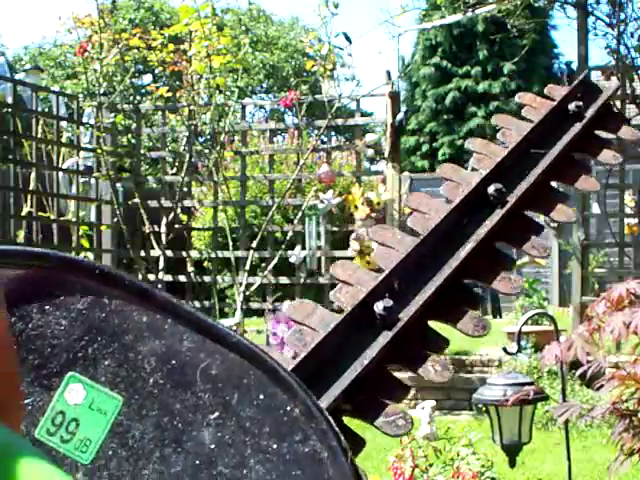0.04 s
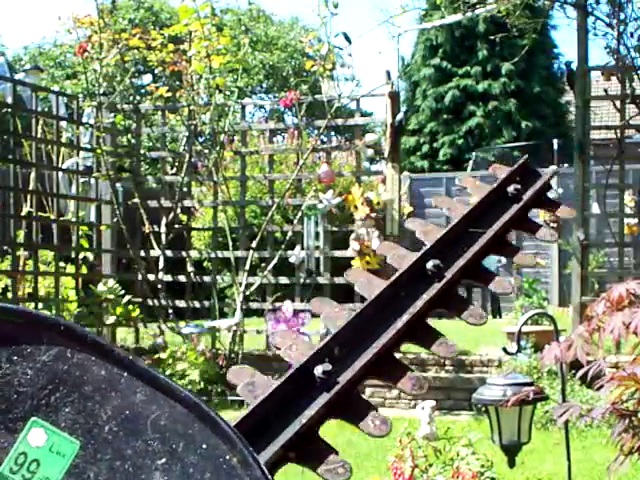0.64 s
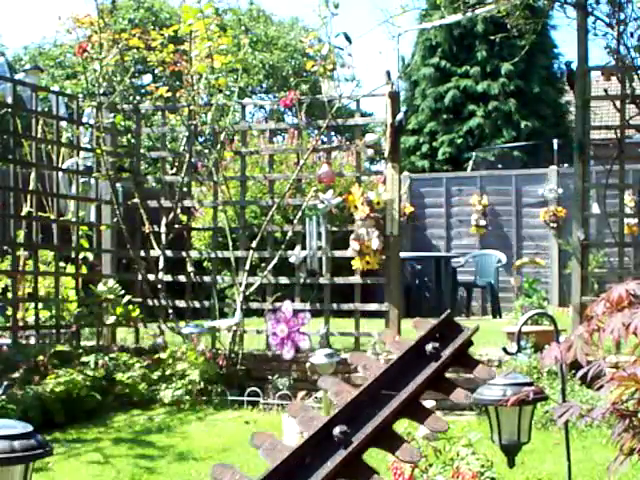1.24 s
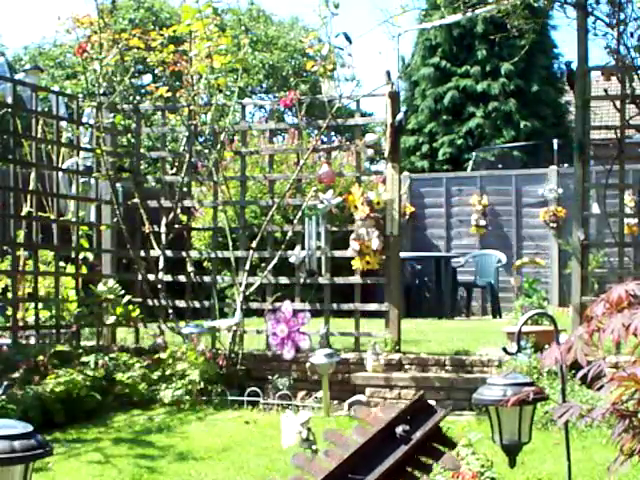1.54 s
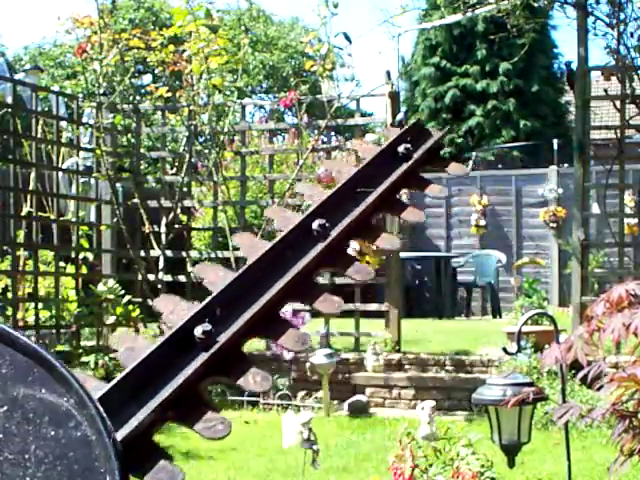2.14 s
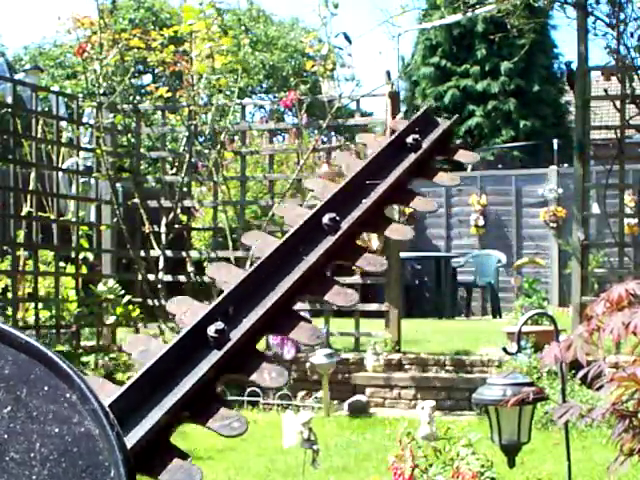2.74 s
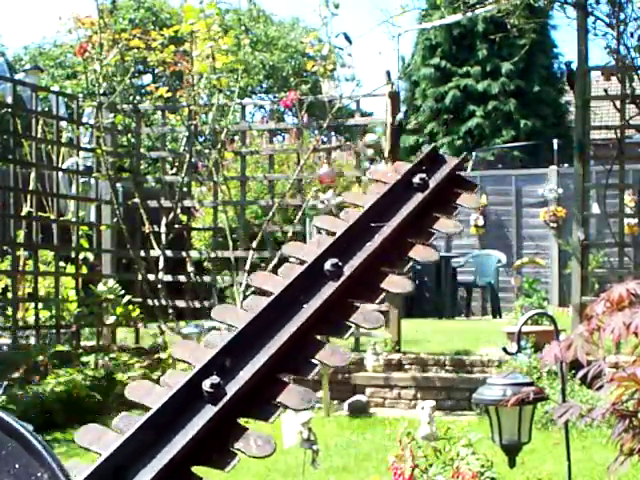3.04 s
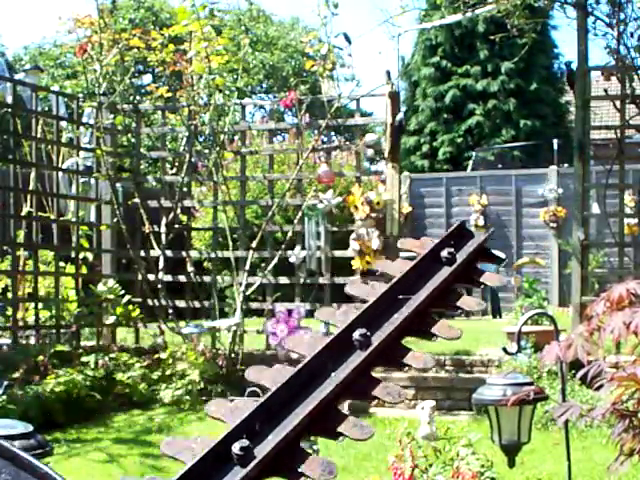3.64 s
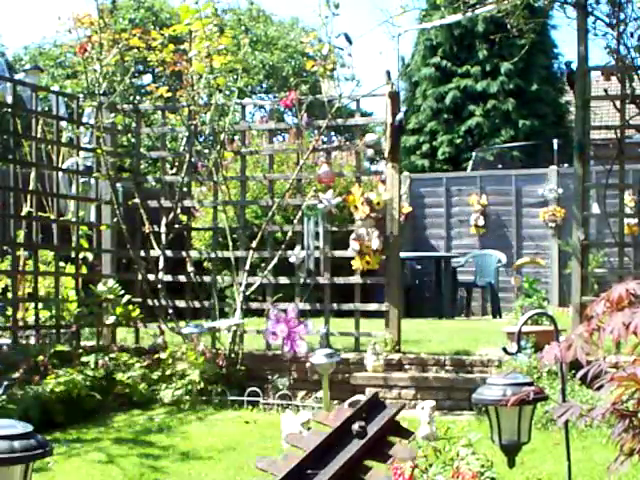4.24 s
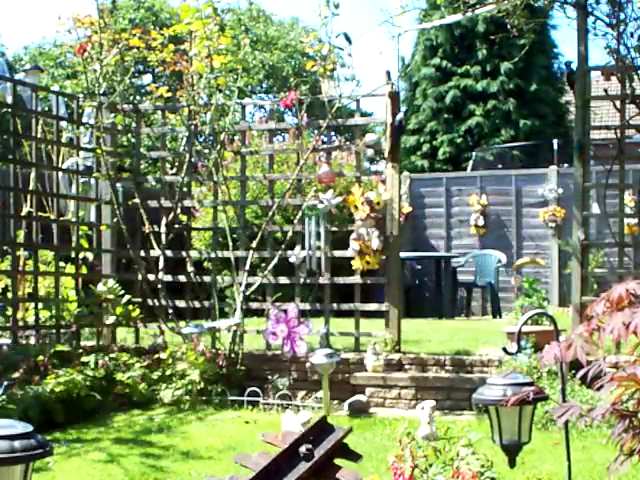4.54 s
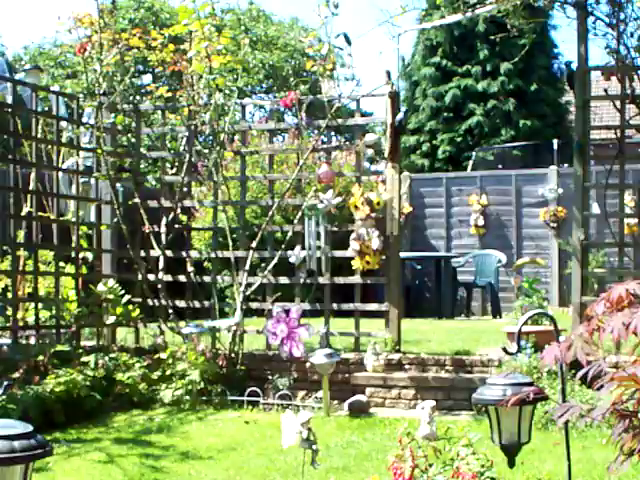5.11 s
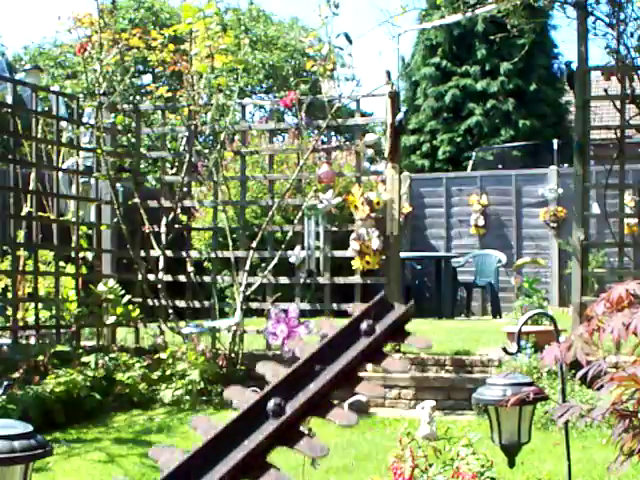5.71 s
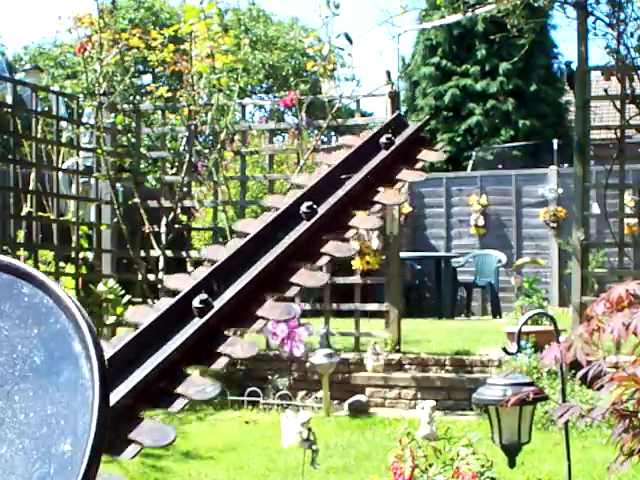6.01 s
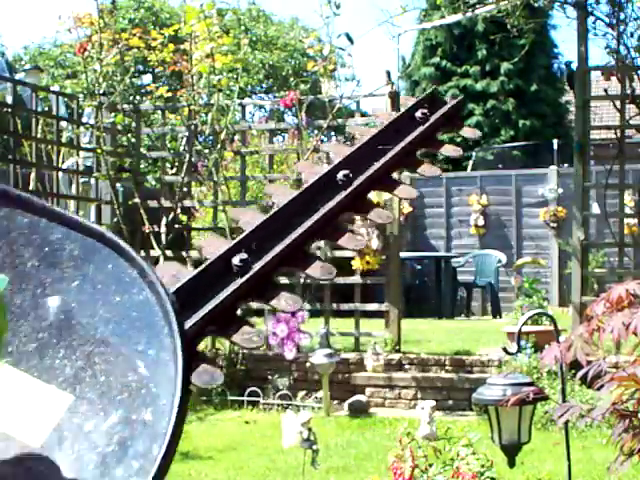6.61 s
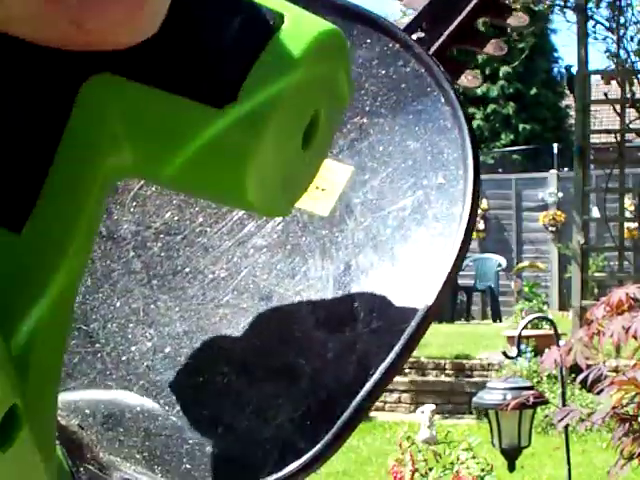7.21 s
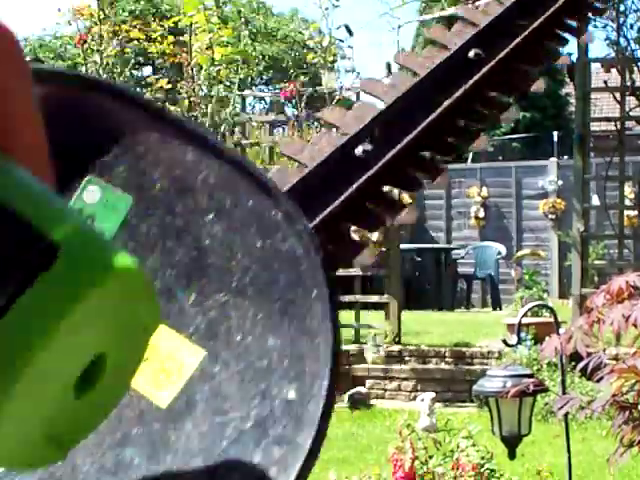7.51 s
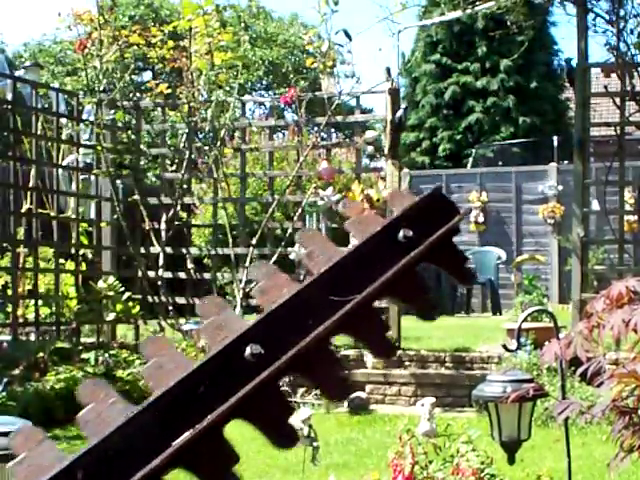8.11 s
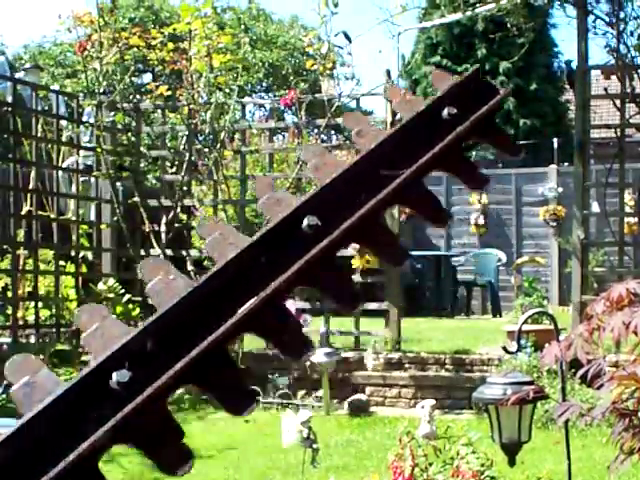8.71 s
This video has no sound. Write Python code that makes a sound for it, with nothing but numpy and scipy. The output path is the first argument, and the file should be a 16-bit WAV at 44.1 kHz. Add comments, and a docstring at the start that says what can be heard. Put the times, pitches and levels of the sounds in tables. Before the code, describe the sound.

Close to the microphone in a quiet garden, a trigger clicks and an electric hedge trimmer starts with a rising whine, settling into a fast metallic clatter with sliding hiss and occasional harder knocks. It soon coasts down, falling in pitch until it stops. Only faint outdoor air and a low hum remain for a moment. More clicks follow, and the trimmer starts again for a longer, steady run.

```python
"""An electric hedge trimmer, close to a small camera's microphone in a garden, runs, stops and runs again.
The trigger clicks before each start. The motor whines up and turns a crank through a gear; the blades
knock at each end of their stroke, ringing the plastic housing, and chatter and hiss as they slide.
Between the two runs it coasts to rest, leaving the quiet garden and a faint low hum."""
import sys
import numpy as np
from scipy import signal
from scipy.io import wavfile
from scipy.ndimage import uniform_filter1d

SR = 44100
rng = np.random.default_rng(int(sys.argv[2]) if len(sys.argv) > 2 else 0)


def digitize_waveform(pressure):
    """Quantize a signal to 16-bit integers and store it at the path in sys.argv[1].

    Rows of a 2-D input are taken as channels; values are limited to [-1, 1].
    """
    field = np.atleast_2d(pressure).T
    bounded = np.clip(field, -1, 1)
    quanta = np.round(bounded * 32767).astype(np.int16)
    wavfile.write(sys.argv[1], SR, quanta)


N = 394694
T = np.arange(N) / SR


def amp(db):
    """Decibels to gain."""
    return 10 ** (np.asarray(db) / 20)


def unit_rms(x):
    """Scales to rms 1."""
    return x / np.sqrt(np.mean(x ** 2) + 1e-20)


def curves(rows):
    """Each column of a table, joined by straight lines in time."""
    times, *columns = np.transpose(rows)
    return [np.interp(T, times, column) for column in columns]


def add(mix, start_s, sound):
    """Mixes a sound in at start_s."""
    part = mix[round(start_s * SR):][:len(sound)]
    part += sound[:len(part)]


def colour(x, spectrum, size=4096):
    """Minimum-phase filter through points of freq_hz, gain_db."""
    hz, db = np.transpose(spectrum)
    log_hz = np.log(abs(np.fft.fftfreq(size, 1 / SR)) + 1)
    log_gain = np.log(amp(np.interp(log_hz, np.log(hz), db)))
    taps = np.fft.ifft(np.exp(np.conj(signal.hilbert(log_gain)))).real
    return signal.oaconvolve(x, taps[:size // 2])[:len(x)]


def resonate(x, hz, width_hz):
    """A resonance of gain 1 whose centre may move."""
    turn = np.exp(2j * np.pi * np.cumsum(hz * np.ones(len(x))) / SR)
    pole = np.exp(-np.pi * width_hz / SR)
    return 2 * (turn * signal.lfilter([1 - pole], [1, -pole], x / turn + 1e-18)).real


def waver(rate_hz):
    """Smooth random drift of rms 1."""
    lowpass = signal.butter(2, rate_hz, fs=SR, output="sos")
    return unit_rms(signal.sosfilt(lowpass, rng.standard_normal(N)))


# The garden's background spectrum: freq_hz, gain_db
GARDEN_SPECTRUM = [(18, -63), (30, -27.5), (58, -22), (74, -13), (96, -16), (148, -12.5), (188, -6.5),
                   (217, -18.5), (256, -9), (1240, -11.5), (1850, -16.5), (4170, -41.5), (7040, -30),
                   (8120, -34), (8930, -64.5), (11600, -91.5), (19600, -120)]
# The background and the hum at the microphone, each: time_s, level_db
GARDEN_LEVEL = [(0, -50.5), (.4, -48.5), (1, -62), (3, -56.5), (8.9, -58.5)]
HUM_LEVEL = [(0, -59), (.3, -57), (.5, -79), (2.9, -71.5), (3.4, -76), (8.9, -77)]

def garden(hum_hz=102):
    """Outdoor background all around the microphone, with a faint low hum."""
    air = unit_rms(colour(rng.standard_normal(N), GARDEN_SPECTRUM))
    hum = np.sqrt(2) * np.cos(2 * np.pi * (hum_hz * T + .15 * waver(6)))
    return amp(curves(GARDEN_LEVEL)[0]) * air + amp(curves(HUM_LEVEL)[0]) * hum


# Handle and trigger clicks, and the gear's kick as it starts or stops: start_s, relative_db, treble_db
CLICKS = [(0.094, -21, -3), (0.176, -33, -6), (0.3198, -24.5, 1), (0.3516, -33, -4), (0.382, -27, -16),
          (0.4228, -15.5, 1), (0.445, -11.5, 1), (0.4555, -31, 2), (0.464, -3.5, 16), (0.4717, -11.5, 11),
          (2.719, 0.5, 0), (3.0819, -39.5, -3), (3.1354, -43, 8), (3.3816, -28, -8), (3.392, -30, -8),
          (3.4311, -31, 0), (3.449, -6, 13), (3.455, -20, 4), (3.466, -4, 10)]
# One click from close by: freq_hz, gain_db
CLICK_SPECTRUM = [(150, -25), (600, 0), (1100, -3), (1600, 11), (2400, 3), (3300, -1.5), (4500, -8),
                  (6500, 2.5), (8500, -8)]

def trigger(slip_s=.0021, decay_s=.0018, size=1500):
    """Plastic and metal parts scrape briefly and snap home."""
    out, t = np.zeros(N), np.arange(size) / SR
    for start_s, db, treble_db in CLICKS:
        snap = rng.standard_normal(size) * (1 - np.exp(-t / slip_s)) * np.exp(-t / decay_s)
        click = colour(colour(snap, CLICK_SPECTRUM), [(2000, .0035), (6000, treble_db)])
        add(out, start_s, amp(db - 23.5) * unit_rms(click))
    return out


# Each pull of the trigger: on_s, off_s, top_speed_hz, rest_angle_turns
RUNS = [(.465, 2.113, 419.46, .79), (3.45, 9, 417.33, .867)]
# Starting torque rattles the blades and jolts the housing, one row a run: load_share, jolt_db
START_TORQUES = [(0.97, 10.5), (0.22, 7)]
GEAR_RATIO = 59 / 4  # shaft turns per crank turn

def drivetrain(surge_s=.0552, settle_s=.1445, warm_s=3.51, coast_s=.825, grip_s=.186, stop_s=.757):
    """Shaft speed in Hz, crank angle in turns and blade load (1 at full speed) as the motor runs."""
    speed, crank, load = np.zeros((3, N))
    for (on_s, off_s, top_hz, rest_angle), (torque, _) in zip(RUNS, START_TORQUES):
        on = T >= on_s
        since_on, since_off = T[on] - on_s, np.maximum(T[on] - off_s, 0)
        # the motor surges, settles, then creeps up to top speed as it warms
        surge = 1 - np.exp(-(since_on / surge_s) ** 1.48)
        settle = 1 - .7 * np.exp(-since_on / settle_s) - .0306 * np.exp(-since_on / warm_s)
        # with the power off it coasts until friction grips; the load then dies faster than the speed
        grip = np.clip((stop_s - since_off) / grip_s, 0, 1)
        share = surge * settle * np.exp(-since_off / coast_s) * grip
        speed[on] = top_hz * share
        crank[on] = rest_angle + np.cumsum(speed[on]) / SR / GEAR_RATIO
        load[on] = share * grip ** .53 + torque * (1 - share) * (since_off == 0)
    return speed, crank, load


# Gear and armature tones: shaft_multiple, relative_db
MOTOR_TONES = [(2, -34.2), (4, -37), (6, -44), (8, -38.5), (12, -43), (15, -43), (17, -40), (18, -41),
               (19, -37)]
# The armature's whine against shaft speed: speed_hz, level_db
WHINE_LEVEL = [(150, -64), (220, -44), (270, -33), (305, -22), (345, -19.5), (380, -21), (415, -25)]

def motor(speed, crank, whine_multiple=21):
    """Shaft and gear tones grow with speed and sink as it slows; the whine sings on the way up and down."""
    turns = crank * GEAR_RATIO + .0017 * waver(60)
    coasting = uniform_filter1d(1. * (np.gradient(speed) < 0), size=6000)
    tones = sum(amp(db + waver(30)) * np.cos(2 * np.pi * (multiple * turns + rng.random()))
                for multiple, db in MOTOR_TONES)
    speed_db = np.interp(speed, [0, 150, 230, 330, 405], [-84, -15, -21.5, -3, -1])
    tones *= amp(.5 - 3 * coasting + speed_db)
    # the rotor's slight unbalance hums once a turn
    shaft_db = -45 - 8 * coasting + np.interp(speed, [100, 220, 400], [-25, -2.5, 0])
    shaft = amp(shaft_db) * np.cos(2 * np.pi * turns)
    whine_db = np.interp(speed, *np.transpose(WHINE_LEVEL)) + 3.4 * waver(50)
    whine = amp(whine_db) * np.cos(2 * np.pi * whine_multiple * turns)
    return np.sqrt(2) * (tones + shaft + whine) * (speed > 0)


def contact(rattle, decay_s, size=1200):
    """One impact: a sharp push and a short rattle of rebounds, energy 1."""
    burst = rng.standard_normal(size) * np.exp(-np.arange(size) / SR / decay_s)
    burst *= rattle / np.linalg.norm(burst)
    burst[0] += 1
    return burst / np.linalg.norm(burst)


def passes(speed, crank, angle_turns):
    """Samples at which the turning crank passes the given angle."""
    return np.flatnonzero((np.diff(np.floor(crank - angle_turns)) > 0) & (speed[1:] > 20))


def stroke_pressure(crank, swing_db, lag_turns, lopsided_db):
    """The blades press hardest just after each reversal, more at one end than at the other."""
    angle = 2 * np.pi * (crank - lag_turns)
    return amp(swing_db * np.cos(2 * angle) + lopsided_db * np.cos(angle))


def chatter(crank, taps_per_s=2200, spread_db=.5):
    """Teeth and guides touch in a dense run of tiny impacts."""
    sizes = amp(spread_db * np.minimum(rng.exponential(1, N), 4)) * rng.choice([-1, 1], N)
    taps = sizes * (rng.random(N) < taps_per_s / SR)
    return unit_rms(taps * stroke_pressure(crank, swing_db=1.5, lag_turns=.016, lopsided_db=-.48))


def reversals(speed, crank, back_turns=.51, back_db=-7.5):
    """Play in the crank is taken up with a knock at both ends of the stroke."""
    knocks = np.zeros(N)
    for angle, db in (0, 0), (back_turns, back_db):
        for at in passes(speed, crank, angle):
            late_ms, strength = np.clip(rng.standard_normal(2), -2, 1.3)
            knock = amp(db + 2.4 * strength) * contact(rattle=.6, decay_s=.003)
            add(knocks, T[at] - .0014 + .001 * late_ms, knock)
    return unit_rms(knocks)


def housing(blows, pitch_hz, jolt_after_s=.044, jolt_width_s=.019):
    """The plastic shell swells and rings, louder as the gear takes up the load just after each start."""
    blows = colour(blows, [(60, -37), (200, -25), (900, -1), (1500, -3), (2200, -2.5), (5000, -6.5)])
    ring = resonate(resonate(blows, pitch_hz, width_hz=870), pitch_hz, width_hz=260)
    jolt_db = sum(db * np.exp(-((T - on_s - jolt_after_s) / jolt_width_s) ** 2)
                  for (on_s, *_), (_, db) in zip(RUNS, START_TORQUES))
    return amp(jolt_db) * unit_rms(ring)


# The tool's balance as it moves about near the microphone, levels relative:
# time_s, housing_db, clatter_db, hiss_db, housing_pitch_hz
POSE = [(0.7, -19.5, -25.0, -19.0, 1513), (0.95, -18.5, -24.0, -18, 1510), (1.6, -20, -25, -21, 1527),
        (2.05, -19, -23.0, -17.5, 1478), (3.8, -20.5, -24.0, -17.5, 1502), (4.7, -19, -25.0, -18.5, 1508),
        (5.45, -20.5, -26.5, -20.0, 1523), (6.0, -23, -22, -17.5, 1410), (6.5, -22.5, -23.5, -18.0, 1440.0),
        (6.9, -19.5, -22.5, -19, 1405), (7.45, -17.5, -23, -18.5, 1487), (8.0, -26, -24.5, -22.5, 1495),
        (8.5, -26, -24, -23.5, 1460), (8.9, -27, -23.5, -21.5, 1474)]
# Ringing of the steel blades: pitch_hz, width_hz, relative_db
BLADE_MODES = [(600, 34, -25), (1043, 100, 5), (1253, 99, 10), (2180, 50, -12.5), (2700, 75, -24),
               (3300, 15, 10), (6900, 200, -7.5)]
# Chatter, knock and sliding hiss at close range, each: freq_hz, gain_db
CHATTER_SPECTRUM = [(60, -45), (150, -22.5), (250, -14), (400, -2.5), (700, 3.5), (1200, 5), (1900, 6),
                    (2800, 6), (3400, 1), (4000, -7.5), (6500, 3), (8500, -4)]
KNOCK_SPECTRUM = [(40, -55.5), (130, -27.5), (300, -8.5), (700, -5.5), (1300, -6), (1900, -0.5), (3000, 10),
                  (4500, -12), (7000, -12), (8500, -11)]
HISS_SPECTRUM = [(300, -42.5), (2000, -12), (4000, -15), (5200, -3.5), (6200, 0.5), (6900, 2), (7600, -1),
                 (8500, -1.5)]

def blades(speed, crank, load):
    """Knocks and chatter ring the housing and the steel; sliding steel and cooling air hiss."""
    housing_db, clatter_db, hiss_db, housing_hz = curves(POSE)
    # the clatter starts with the shaft and rings on briefly after it stops
    drive = signal.lfilter([1 / 300], [1, 1 / 300 - 1], load + 1e-9)
    knocks, taps = reversals(speed, crank), chatter(crank)
    shell = housing(.69 * knocks + taps, housing_hz)
    steel = sum(amp(db) * resonate(taps + .5 * knocks, hz, width) for hz, width, db in BLADE_MODES)
    clatter = (amp(6) * unit_rms(colour(taps, CHATTER_SPECTRUM))
               + amp(-9.5) * unit_rms(colour(knocks, KNOCK_SPECTRUM))
               + amp(-7.5) * unit_rms(steel))
    pressure = stroke_pressure(crank, swing_db=.5, lag_turns=.031, lopsided_db=-.84)
    friction = rng.standard_normal(N) * pressure * amp(.64 * waver(250))
    hiss = unit_rms(colour(friction, HISS_SPECTRUM))
    sliding = np.minimum(speed / speed.max(), load)
    return (amp(housing_db - 2) * drive ** .6 * shell
            + amp(clatter_db - .46) * drive ** .66 * clatter
            + amp(hiss_db + 6.5) * sliding ** 2.04 * hiss)


# The hardest blade knocks: start_s, relative_peak_db
HARD_KNOCKS = [(.511, -4), (1.3189, -5), (1.3544, -5), (1.499, -5), (1.6432, -5), (1.8936, -5),
               (2.2254, -6), (2.7816, -6.5), (3.502, -4), (3.62, -5), (3.9395, -6), (4.1226, -6),
               (4.811, -4), (5.0994, -6), (6.785, -5), (6.8569, -5), (6.9292, -5), (7.4086, -5)]

def blade_slams(speed, crank, load, end_turns=.96, chance=.13):
    """A blade slams into its end of travel and the housing rings, at set times and on chance strokes."""
    out, ends = np.zeros(N), passes(speed, crank, end_turns)
    slams = ends[rng.random(len(ends)) < chance]
    housing_db = curves(POSE)[0]
    slam_db = 11.5 + housing_db[slams] + 20 * np.log10(load[slams])
    for start_s, db in HARD_KNOCKS + list(zip(T[slams], slam_db)):
        blow = contact(rattle=.37, decay_s=.0022)
        ring = resonate(resonate(blow, 1450, width_hz=900), 1500, width_hz=280)
        slam = ring + amp(-23) * colour(blow, KNOCK_SPECTRUM)
        add(out, start_s, amp(db - 2) * slam / abs(slam).max())
    return out


def fence_echoes(x, t60_s=.17, size=12000):
    """The garden fences return a short, thin scatter of echoes."""
    t = np.arange(size) / SR
    scatter = rng.standard_normal(size) * (rng.random(size) < .1)
    tail = scatter * amp(-60 * t / t60_s) * (t > .004)
    return signal.oaconvolve(x, tail / np.linalg.norm(tail))[:N]


def scene():
    """The trimmer close to the microphone, faint echoes and the garden behind it, in mono."""
    speed, crank, load = drivetrain()
    tool = blades(speed, crank, load) + blade_slams(speed, crank, load) + motor(speed, crank) + trigger()
    return (tool + amp(-17.5) * fence_echoes(tool) + garden())[None]


# The camera's filters either side of its sampling, each: freq_hz, gain_db
BEFORE_SAMPLING = [(7500, 0), (8000, -3), (8300, -10), (8600, -27), (9000, -50)]
AFTER_SAMPLING = [(7300, 0), (8000, -4), (8500, -14), (8800, -27), (9100, -40)]

def record(dry, notch_hz=4225, notch_width_hz=950, sampling_hz=16000, edge_hz=8970):
    """The camera cuts the bass and a notch, mirrors the treble about 8 kHz by sampling, and clips peaks."""
    x = signal.lfilter(*signal.iirnotch(notch_hz, notch_hz / notch_width_hz, SR), dry[0])
    x = signal.sosfilt(signal.butter(2, 32, "high", fs=SR, output="sos"), x)
    mirrored = colour(x, BEFORE_SAMPLING) * (1 + 2 * np.cos(2 * np.pi * sampling_hz * T))
    clipped = np.clip(colour(mirrored, AFTER_SAMPLING), -.85, .85)
    lowpass = signal.firwin(711, edge_hz, window=("kaiser", 9), fs=SR)
    return signal.oaconvolve(clipped, lowpass, "same")[None]


dry = scene()
out = record(dry)
digitize_waveform(out)
```